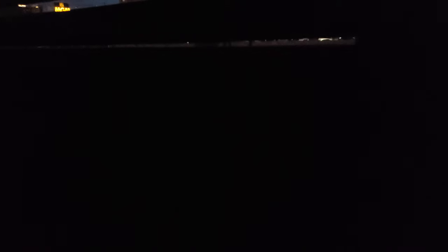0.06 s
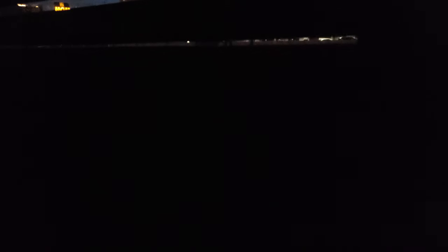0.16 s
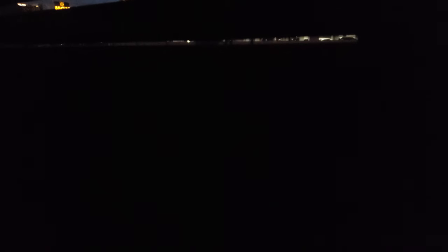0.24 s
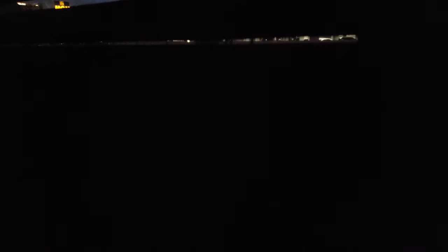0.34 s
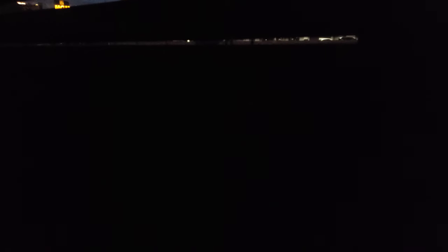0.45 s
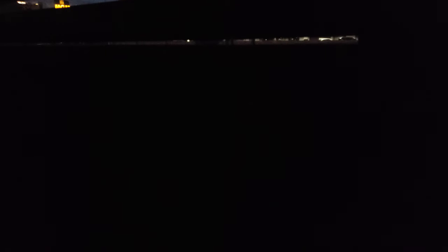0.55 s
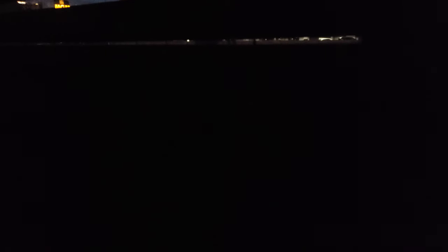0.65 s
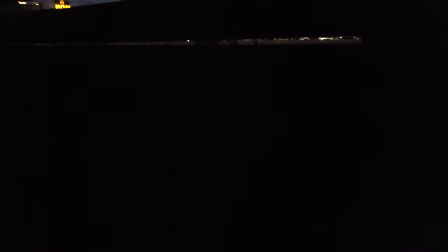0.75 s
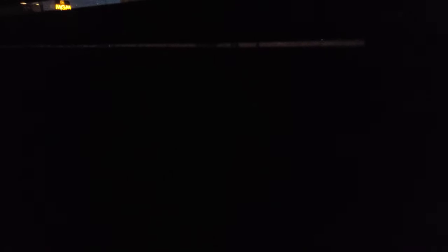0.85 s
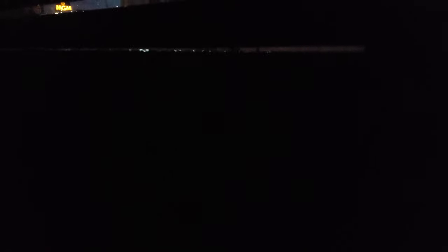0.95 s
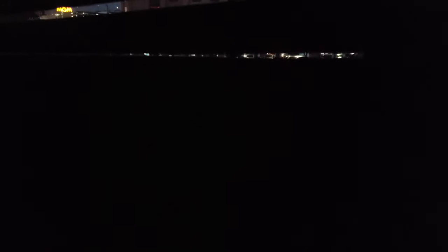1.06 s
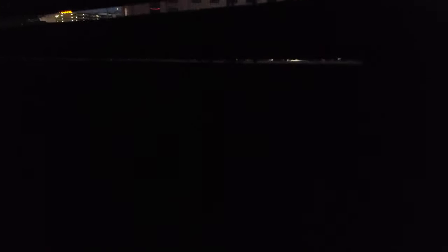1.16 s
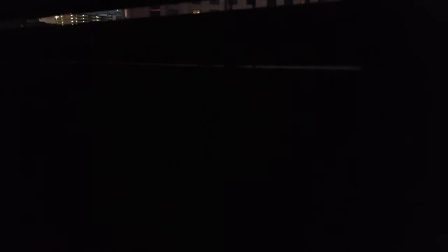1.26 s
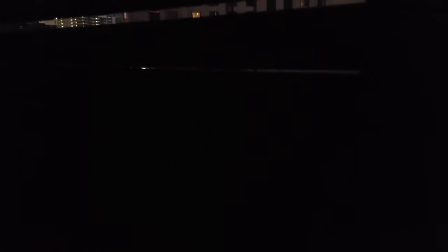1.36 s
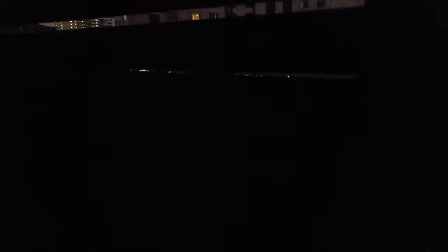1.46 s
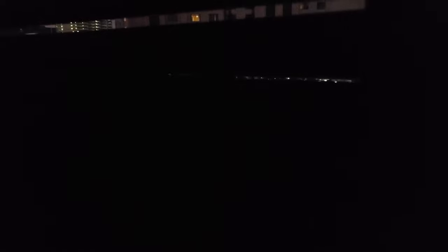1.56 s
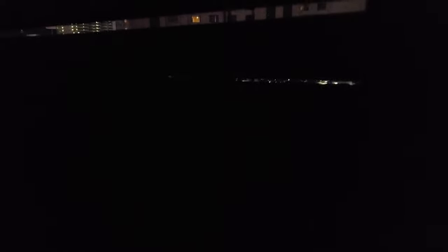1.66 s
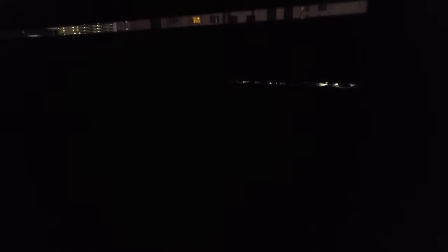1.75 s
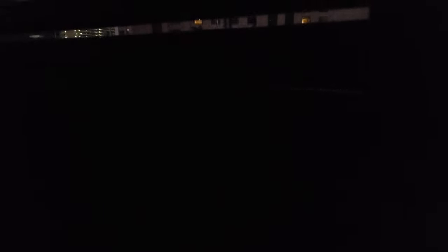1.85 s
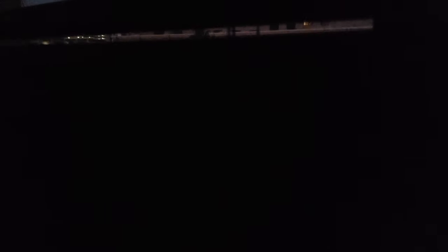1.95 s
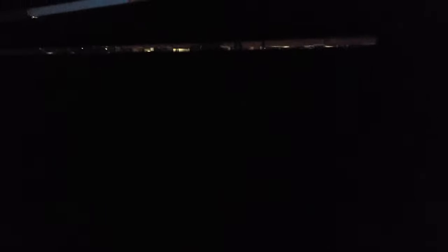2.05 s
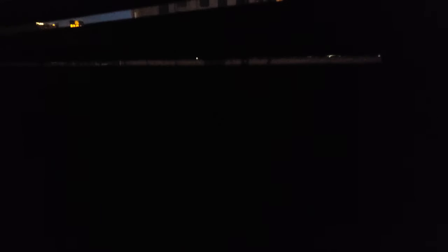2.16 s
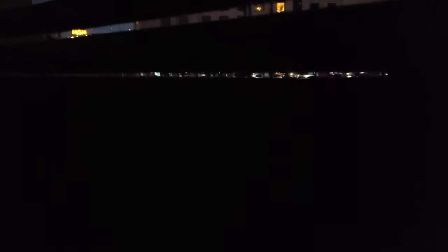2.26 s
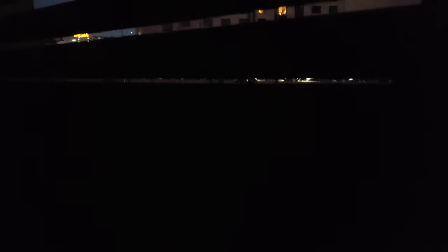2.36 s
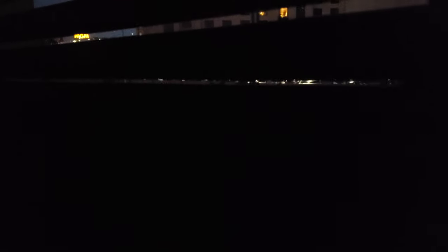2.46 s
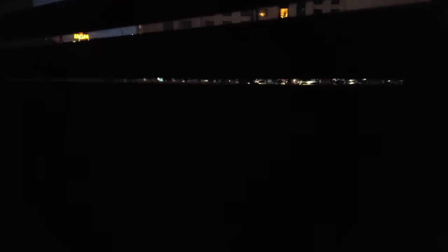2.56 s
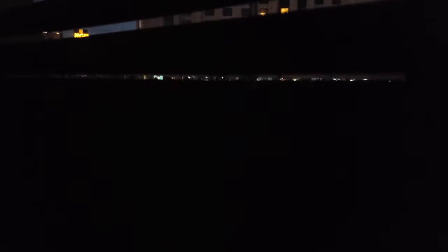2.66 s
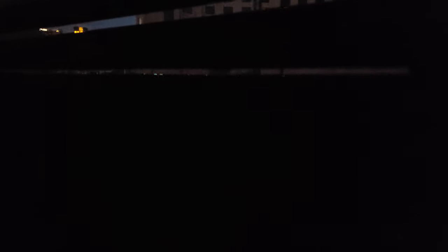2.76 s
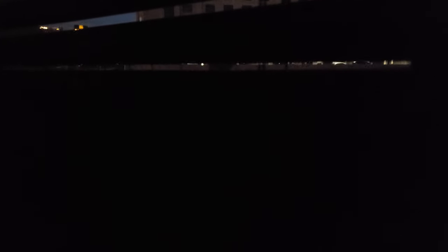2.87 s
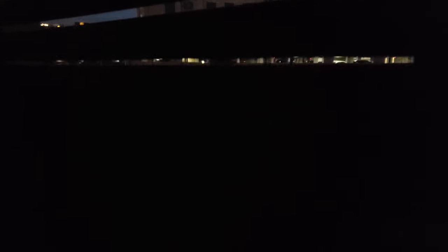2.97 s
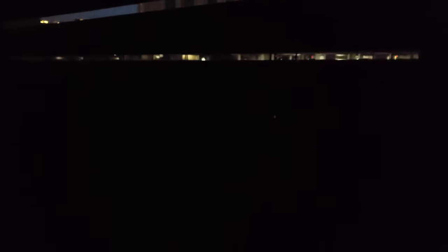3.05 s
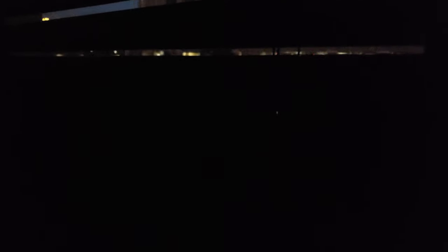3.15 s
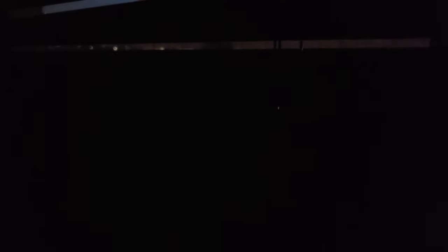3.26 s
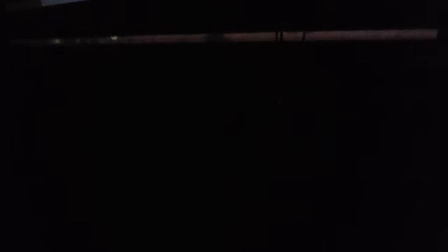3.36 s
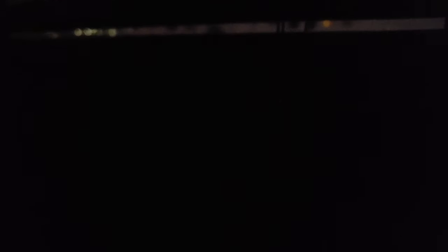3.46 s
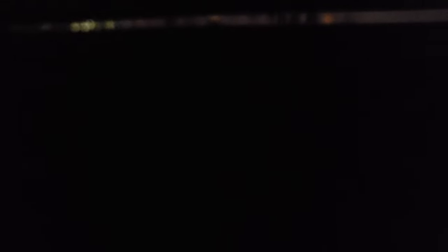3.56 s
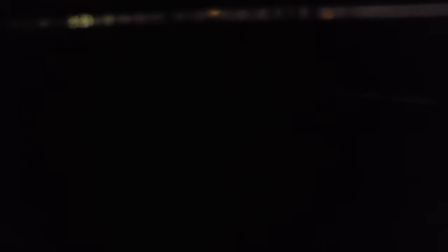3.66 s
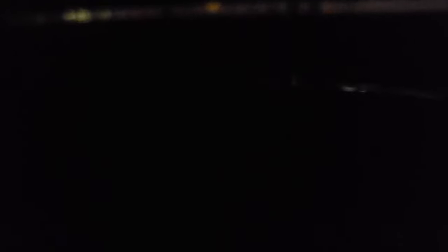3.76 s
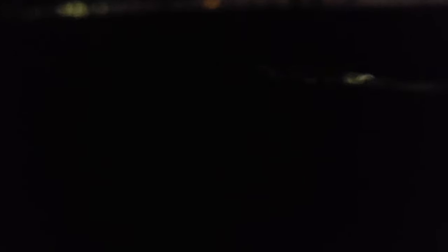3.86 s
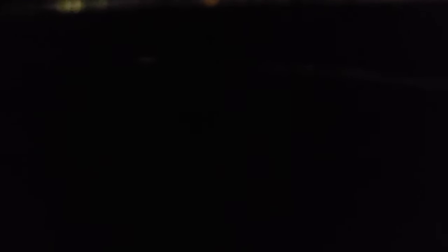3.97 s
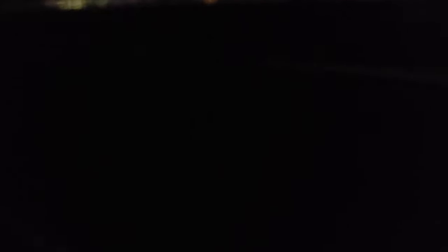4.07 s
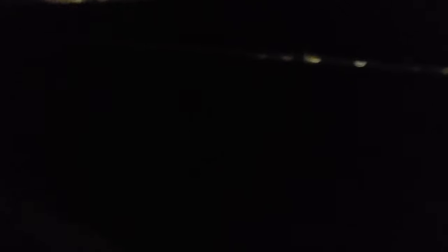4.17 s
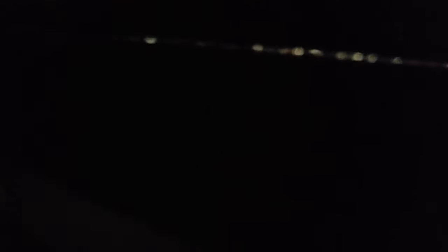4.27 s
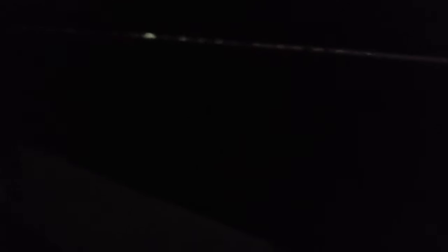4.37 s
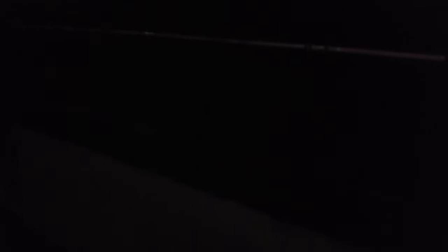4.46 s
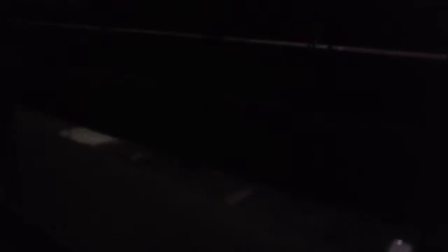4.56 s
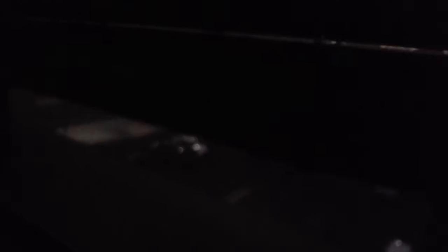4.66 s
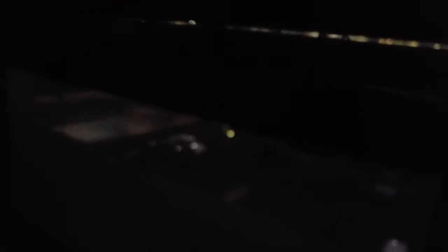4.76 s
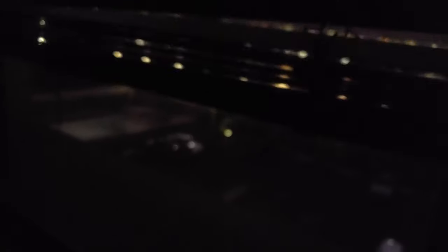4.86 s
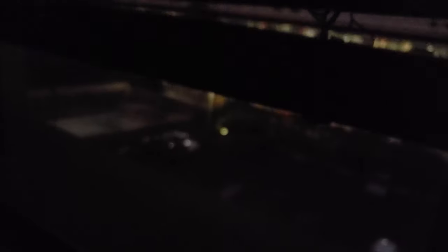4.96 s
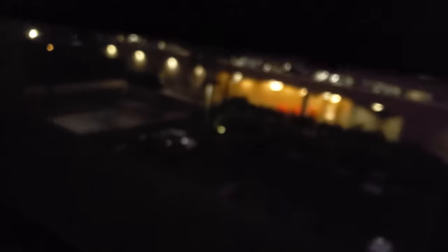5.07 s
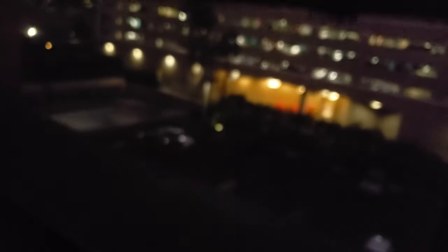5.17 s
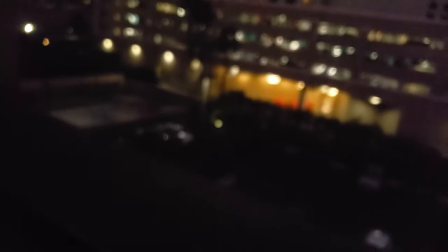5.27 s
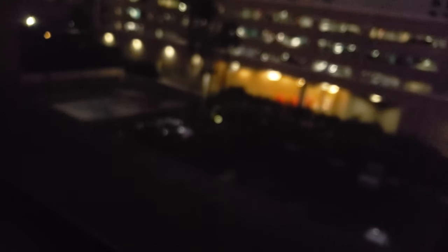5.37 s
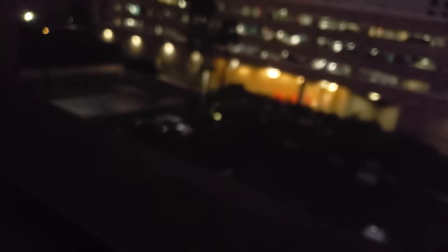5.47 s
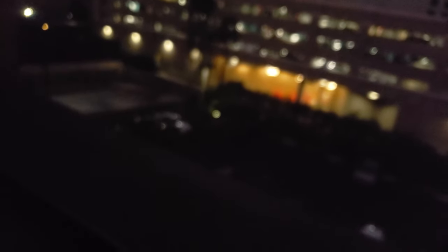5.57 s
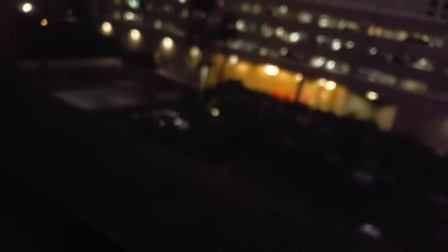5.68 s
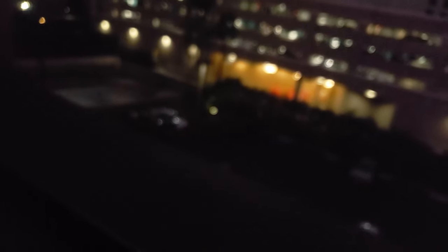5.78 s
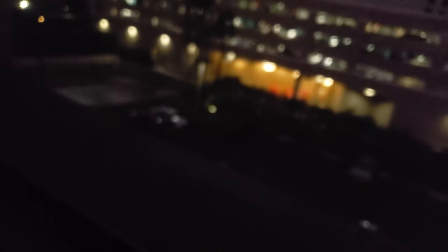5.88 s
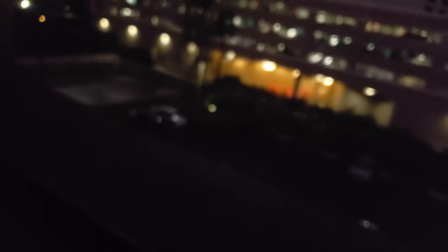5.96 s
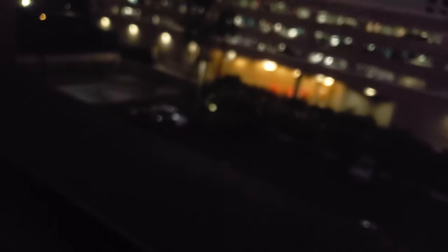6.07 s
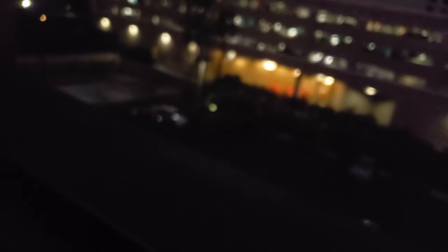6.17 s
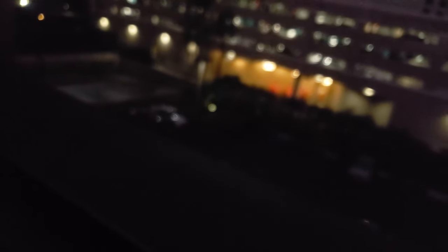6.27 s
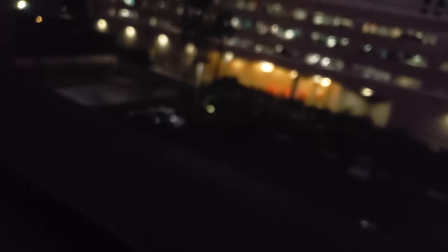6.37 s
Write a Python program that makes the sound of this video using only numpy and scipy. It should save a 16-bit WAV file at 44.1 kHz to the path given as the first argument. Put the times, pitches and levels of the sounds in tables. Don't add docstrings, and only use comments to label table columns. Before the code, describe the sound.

Quiet room at night with a steady low ventilation rumble. Fingers rub softly along a cord, its tassel ticking close by on the right. Then the cord is pulled: a rough hiss runs through a hollow rail while slats rattle and clack together as they stack. Sharp knocks mark the landing, and swaying slats brush more softly until still. Close stereo microphone, short room echo.

```python
import sys
import numpy as np
from scipy import signal
from scipy.fft import rfft, irfft
from scipy.io import wavfile
from scipy.ndimage import uniform_filter1d

SR = 44100
rng = np.random.default_rng(int(sys.argv[2]) if len(sys.argv) > 2 else 0)


def nominal_scale(level):
    x = np.asarray(level, float) / 20
    return 10 ** x


def dump_mix(stems):
    frames = np.atleast_2d(stems).T
    limited = np.clip(frames, -1, 1)
    pcm = np.round(limited * 32767).astype(np.int16)
    wavfile.write(sys.argv[1], SR, pcm)


N = 283197
SIZE = 8192
BODY_PAN_DB = 2.5

# (lowest [Hz], highest [Hz])
ZONES_HZ = [(300, 1000), (1000, 2400), (2400, 8400), (8400, 20000)]
# (frequency [Hz], level per Hz [dB])
FINGER_COLOUR = [(240, -57.5), (400, -11.5), (762, -9), (1640, -9.5), (1890, -8), (3130, -32.5),
                 (3590, -25.5), (5440, -19), (7070, -26), (10500, -17), (13900, -5), (15700, -5)]
# (frequency [Hz], level per Hz [dB])
BLIND_COLOUR = [(180, -52), (300, -17.5), (554, -12.5), (698, -5.5), (988, -9.5), (1520, -4), (2500, -12.5),
                (3200, -10.5), (3970, -11.5), (7330, -15.5), (8510, -17.5), (11700, -16), (15700, -17)]
# (frequency [Hz], width [Hz], boost [dB])
RAIL = [(702.7, 20, 14), (1460, 160, -1), (3250, 430, 1.5), (1090, 16, 0), (1406, 54, 8), (1533, 38, 5.5),
        (1690, 30, 8), (2150, 40, 3)]
# (time [s], effort [dB])
PULL = [(2.7, -36), (2.85, -42.5), (3.14, -15), (3.18, -10.5), (3.34, -4.5), (3.45, -6), (3.58, -2.5),
        (3.72, -1), (3.86, 1), (4.08, -0.5), (4.2, -2), (4.4, 0), (4.58, -2.5), (4.69, -2), (4.91, -12),
        (5.03, -15.5), (5.3, -12.5)]


def rms_one(x):
    return x / np.sqrt(np.mean(x ** 2) + 1e-30)


def in_time(rows):
    s, *columns = np.transpose(rows)
    return np.array([np.interp(np.arange(N) / SR, s, c) for c in columns])


def at_hz(points, hz):
    listed_hz, values = np.array(points).T
    return np.interp(np.log(hz), np.log(listed_hz), values)


def drift(rate):
    r = np.exp(-80 * np.pi * rate / SR)
    white = rng.standard_normal(N // 40 + 2002)
    slow = signal.lfilter([1], [1, -2 * r, r * r], white)[2000:]
    return np.interp(np.arange(N) / 40, np.arange(len(slow)), rms_one(slow))


def response(spectrum, peaks, low_hz, high_hz):
    hz = np.maximum(np.arange(SIZE // 2 + 1), .1) * SR / SIZE
    db = at_hz(spectrum, np.minimum(hz, 15600))
    db = db - 10 * np.log10((1 + (low_hz / hz) ** 10) * (1 + (hz / high_hz) ** 10))
    for centre_hz, width_hz, peak_db in peaks:
        db = db + peak_db / (1 + (2 * (hz - centre_hz) / width_hz) ** 2)
    cepstrum = irfft(np.log(nominal_scale(np.maximum(db, db.max() - 90))))
    cepstrum[1:SIZE // 2] *= 2
    h = irfft(np.exp(rfft(cepstrum[:SIZE // 2], SIZE)))[:SIZE // 2]
    return h / np.sqrt(np.sum(h ** 2))


def through(x, h):
    return signal.oaconvolve(x, np.atleast_2d(h), axes=1)[:, :x.shape[1]]


def pair(white, hz):
    # (frequency [Hz], left-right likeness [-1 to 1])
    likeness = [(60, 1), (150, 0.88), (380, 0.89), (950, 0.34), (2380, -0.18), (5980, 0.015),
                (15000, 0.026)]
    alike = np.clip(at_hz(likeness, hz), -.99, .99)
    shared = np.sqrt(1 + alike) * white[0]
    opposed = np.sqrt(1 - alike) * white[1] * [[1], [-1]]
    return (shared + opposed) / np.sqrt(2)


def sides(pan_db):
    return nominal_scale(np.multiply.outer([.5, -.5], pan_db))


def zone_levels(effort, strokes, zones, span):
    lean = [-1.12, -0.21, -0.17, 1.0]
    attack_s, fall_db_per_s = 0.019, 216
    t = np.arange(N)[span] / SR
    base_db, follows, offset_db = np.transpose(zones)[..., None]
    power = nominal_scale(base_db + follows * in_time(effort)[0][span]) ** 2
    for start, hold, db, brightness_db in strokes:
        rise = np.clip((t - start) / attack_s, 0, 1)
        fall = nominal_scale(-fall_db_per_s * np.maximum(t - start - hold, 0))
        power += (rise * fall * nominal_scale(db + offset_db + brightness_db * np.array(lean)[:, None])) ** 2
    return np.sqrt(power)


def rubbing(rows, strokes, zones, colour, peaks, flicker_db, grains_per_s, grain_db, pan_db):
    wander = .011
    span = slice(round((rows[0][0] - .02) * SR), round((rows[-1][0] + .02) * SR))
    levels = zone_levels(rows, strokes, zones, span)
    steps = np.arange(levels.shape[1])
    sounding = np.sqrt(np.clip(np.minimum(steps, steps[::-1]) / (.04 * SR), 0, 1))
    sizes_db = grain_db + 1.2 * np.minimum(rng.exponential(1, len(steps)), 3)
    snags = (rng.random(len(steps)) < grains_per_s / SR) * nominal_scale(sizes_db)
    push = (1 + signal.lfilter([1], [1, -.985], snags)) * nominal_scale(flicker_db * drift(25)[span])
    pans = [sides(BODY_PAN_DB)[:, None]] * 3 + [sides(pan_db)[:, None]]
    out = np.zeros((2, N))
    for (low_hz, high_hz), level, pan in zip(ZONES_HZ, levels, pans):
        hiss = pair(rng.standard_normal((2, len(steps))), np.sqrt(low_hz * high_hz))
        force = rms_one(push * nominal_scale(2.0 * flicker_db * drift(33)[span]) * hiss) * level * sounding
        tilt = .5 * (1 + np.tanh(2 * drift(1.5)[span]))
        poses = [(1, 1)]
        if peaks and low_hz < 2000:
            poses = [(1 - tilt, 1 - wander), (tilt, 1 + wander)]
        for share, shift in poses:
            pose = [(shift * hz, width_hz, db) for hz, width_hz, db in peaks]
            out[:, span] += through(force * pan * share, response(colour, pose, low_hz, high_hz))
    return out


def blows(rows, colour, peaks, trim_db, rise, crack, bright_share, bright_db, pan_db):
    out, steps = 0, np.arange(2048)
    shakes = rng.standard_normal((len(rows), 4, 2, len(steps)))
    for zone, (low_hz, high_hz) in enumerate(ZONES_HZ):
        h = response(colour, peaks, low_hz, high_hz)
        force = np.zeros((2, N + len(steps)))
        lasting = [2.2, 1.3, 2.16, 1.34][zone]
        pan = sides(pan_db if zone == 3 else BODY_PAN_DB)[:, None]
        for (s, db, depth_db, t60_ms), shake in zip(rows, shakes[:, zone]):
            age = steps / (max(t60_ms, 1) * lasting * SR / 1000)
            burst = pair(shake, np.sqrt(low_hz * high_hz)) * np.tanh(age / rise)
            burst = burst * (nominal_scale(-60 * age) + crack * (zone < 3) * nominal_scale(-300 * age))
            top = np.abs(through(burst, h[:len(steps)])).max(axis=1, keepdims=True)
            zone_db = [depth_db - 7.0, depth_db, bright_share * depth_db + bright_db, 0][zone]
            at = round(s * SR)
            force[:, at:at + len(steps)] += nominal_scale(db + zone_db + trim_db) * pan * burst / top
        out = out + through(force[:, :N], h)
    return out


def knocks(rows, trim_db, partner, pan_db):
    out, t = np.zeros(N + SIZE), np.arange(SIZE) / SR
    for s, db, hz, t60 in rows:
        tone = np.sin(2 * np.pi * hz * t) + partner * np.sin(2 * np.pi * 1.13 * hz * t)
        fall = nominal_scale(db + trim_db - 60 * t / max(t60, .002))
        out[round(s * SR):][:SIZE] += fall * tone * np.tanh(t / 0.00034)
    return out[:N] * sides(pan_db)[:, None]


def chafes(rows):
    glide = 0.028
    out = np.zeros((2, N))
    grit = nominal_scale(2.76 * drift(76))
    for start, end, first_hz, width_hz, db in rows:
        at, length = round(start * SR), round((end - start) * SR)
        stroke = np.sin(np.linspace(0, np.pi, length)) ** 0.4 * grit[at:at + length]
        draw = [pair(white, first_hz) for white in rng.standard_normal((2, 2, SIZE * 5))]
        narrow = signal.butter(2, width_hz / 2, fs=SR, output="sos")
        wobble = signal.sosfilt(narrow, draw)[..., -length:]
        pan = sides(-9 if 2 < start < 2.5 or first_hz > 9000 else BODY_PAN_DB)[:, None]
        phase = 2 * np.pi * first_hz * np.cumsum(1 + glide * np.linspace(-1, 1, length)) / SR
        tone = wobble[0] * np.sin(phase) + wobble[1] * np.cos(phase)
        out[:, at:at + length] += nominal_scale(db) * stroke * pan * rms_one(tone)
    return out


def ventilation():
    # (frequency [Hz], level per Hz [dB])
    rumble = [(16, -41), (28, -1), (71, -1.5), (92, -0.5), (145, 0.5), (227, -10), (365, -22), (406, -33),
              (727, -35.5), (809, -28), (1030, -32), (1740, -44), (8540, -59.5), (15700, -42)]
    # (frequency [Hz], width [Hz], boost [dB])
    duct = [(70.6, 14, 6), (139.7, 12, 7.5), (342.6, 30, 4), (284.5, 2.76, 16.5), (556.3, 5.4, 20.5),
            (732.7, 36, 15)]
    # (time [s], level [dB])
    swell = [(0.0, -51.5), (0.35, -52), (0.82, -50.5), (1.73, -48.5), (2.2, -51.5), (2.59, -50),
             (2.93, -52), (3.18, -48.5), (4.06, -52.5), (4.77, -48), (5.18, -50), (5.42, -56), (6.42, -53)]
    out, levels_db = 0, [in_time(swell)[0], -62, -68, -73]
    for low_hz, high_hz, db in zip([29, 250, 450, 1000], [250, 450, 1000, 20000], levels_db):
        hiss = pair(rng.standard_normal((2, N)), np.sqrt(low_hz * high_hz))
        out = out + nominal_scale(db) * through(hiss, response(rumble, duct, low_hz, high_hz))
    return out * sides(2.1)[:, None]


def room(x):
    t60_s, level_db, cut_hz = 0.37, -7, 7900
    t = np.arange(SR // 2) / SR
    tail = rng.standard_normal((2, len(t))) * nominal_scale(-60 * t / t60_s) * np.clip(t / 0.0038, 0, 1)
    bass = signal.sosfiltfilt(signal.butter(2, 800, fs=SR, output="sos"), tail)
    dulling = signal.butter(1, cut_hz, fs=SR, output="sos")
    tail = signal.sosfilt(dulling, tail - bass + bass[0])
    return nominal_scale(level_db) * through(x, tail / np.sqrt(np.sum(tail ** 2) / 2))


def finger_rub():
    # (time [s], effort [dB])
    fingers = [(.02, -11), (.45, -7), (.63, 1), (.83, -0.5), (1.0, 5.5), (1.9, 10), (2.05, -1),
               (2.45, -1.5), (2.7, -5)]
    # (start [s], hold [s], level [dB], brightness [dB])
    slips = [(1.286, 0.071, -75, 15), (1.396, 0.029, -70.5, -15.5), (1.572, 0.033, -72.5, -18),
             (1.737, 0.12, -58, -0.5), (2.1, 0.03, -64, -4), (2.25, 0.079, -78, 0),
             (2.427, 0.096, -81.5, -10)]
    # (level at effort 0 [dB], follows effort [dB per dB], stroke offset [dB])
    finger_zones = [(-71, -0.21, -5.5), (-85, 0.47, 2.5), (-95, 1.96, -1.5), (-75.5, 0.7, -5)]
    return rubbing(fingers, slips, finger_zones, FINGER_COLOUR, [],
                   flicker_db=0.5, grains_per_s=34, grain_db=-40, pan_db=-11.5)


def edge_drags():
    # (start [s], end [s], pitch [Hz], width [Hz], level [dB])
    drags = [(0.79, 1.26, 16600, 3400, -69), (1.517, 1.596, 13700, 2600, -64),
             (1.75, 1.846, 2520, 1000, -57), (1.28, 1.36, 1600, 430, -69.5), (5.88, 6.17, 1490, 55, -68),
             (4.78, 4.93, 13000, 4000, -58), (1.285, 1.36, 5500, 1100, -85), (4.75, 4.9, 450, 250, -47.5),
             (1.81, 1.9, 4650, 500, -62), (2.05, 2.13, 4850, 320, -84), (2.09, 2.16, 5050, 450, -68),
             (2.125, 2.155, 10000, 660, -68), (5.1, 5.2, 12000, 3500, -48),
             (4.25, 4.34, 12500, 3500, -49.5), (2.086, 2.154, 1800, 150, -63.5),
             (2.07, 2.15, 9550, 830, -81), (2.2, 2.22, 3550, 470, -62), (2.25, 2.37, 3670, 810, -72.5),
             (2.262, 2.36, 14700, 4700, -53), (2.09, 2.15, 14700, 1800, -63),
             (3.02, 3.16, 13000, 2200, -76), (2.305, 2.356, 2250, 410, -57), (2.74, 2.768, 3250, 300, -77),
             (2.76, 3.16, 7200, 1500, -82), (2.74, 2.9, 1500, 890, -72), (5.04, 5.085, 166, 133, -36),
             (3.309, 3.385, 2900, 740, -47)]
    return chafes(drags)


def close_ticks():
    # (time [s], peak [dB], depth [dB], fall by 60 dB [ms])
    taps = [(1.3684, -55, -17, 6.7), (1.4032, -50.5, -6, 10), (1.5289, -58, -25, 6),
            (1.5832, -52.5, 6, 5.2), (1.713, -51.5, -1, 6.3), (1.7501, -43.5, 7, 7.4),
            (2.128, -34, -16, 4.2), (2.1568, -53, -6, 3.5), (2.1678, -27.5, -25, 4.6),
            (2.1914, -29, -27, 3), (2.1982, -31, -22, 4.7), (2.203, -33, -26, 3), (2.2064, -38, -23, 4),
            (2.333, -34, -53, 1.4), (2.749, -60, -23, 2.6)]
    # (time [s], peak [dB], pitch [Hz], fall by 60 dB [s])
    beads = [(2.128, -46, 7030, 0.0045), (2.128, -50, 3600, 0.0059), (2.1985, -39.5, 3600, 0.018),
             (1.404, -50, 1470, .012), (1.369, -55, 7000, .005), (1.53, -52, 12500, .005),
             (1.541, -56, 13200, .005), (1.729, -49, 12000, .005), (1.739, -50, 12000, .005),
             (1.7525, -39.5, 1850, 0.12), (2.168, -36, 7160, 0.0072), (2.1915, -36, 7100, .008),
             (2.168, -41, 3550, .015), (2.1915, -38, 3600, 0.01), (2.333, -33, 11300, .005)]
    right_edges = [(2.1281, -18.5, 13800, .004), (2.1983, -21, 14200, .004), (2.6862, -52, 11500, .004),
                   (4.5153, -30, 14000, .006), (4.7058, -25, 13000, .005), (4.7268, -26, 12500, .005),
                   (4.7382, -21, 13500, .006), (5.0605, -14, 14600, .005), (5.0898, -9, 12300, .004),
                   (5.0999, -8, 14830, .005)]
    tick_peaks = [(3600, 710, 10.5), (7100, 820, 7.4), (13500, 1800, 11)]
    out = blows(taps, FINGER_COLOUR, tick_peaks, trim_db=0.0, rise=0.016, crack=5.1,
                bright_share=0.2, bright_db=1.5, pan_db=-15.0)
    out = out + knocks(beads, trim_db=-0.5, partner=0.088, pan_db=1)
    return out + knocks(right_edges, trim_db=-0.6, partner=.31, pan_db=-14.0)


def swaying_slats():
    # (time [s], effort [dB])
    settle = [(5.3, 3.5), (5.43, 2), (5.6, -1), (6.09, -2), (6.19, -8), (6.28, -19.5), (6.42, -36)]
    # (start [s], hold [s], level [dB], brightness [dB])
    brushes = [(5.635, 0.089, -56.5, 7), (5.75, 0.089, -62, 0), (5.993, 0.073, -62.5, 4)]
    # (level at effort 0 [dB], follows effort [dB per dB], stroke offset [dB])
    sway_zones = [(-59.5, 1.08, 1), (-54.5, 1.2, 5.5), (-61.5, 1.1, -1.5), (-58, 0.62, -3)]
    # (frequency [Hz], level per Hz [dB])
    sway_colour = [(240, -48), (400, -19.5), (569, -15.5), (717, -15.5), (786, -17.5), (1170, -14.5),
                   (1500, -3), (2490, -19), (6960, -20.5), (8760, -29), (15700, -25)]
    # (frequency [Hz], width [Hz], boost [dB])
    slats = [(723, 28, 9.5), (1500, 20, 8)]
    return rubbing(settle, brushes, sway_zones, sway_colour, slats,
                   flicker_db=0.05, grains_per_s=59, grain_db=-24.0, pan_db=2.0)


def more_drags():
    # (start [s], end [s], pitch [Hz], width [Hz], level [dB])
    tints = [(1.29, 1.46, 6700, 900, -80), (1.55, 1.66, 6700, 900, -79), (1.75, 1.93, 6600, 1100, -68.5),
             (1.78, 1.89, 14200, 1800, -66), (1.79, 1.87, 9500, 800, -73), (2.26, 2.31, 2050, 200, -71),
             (2.21, 2.36, 7000, 900, -78), (3.71, 3.8, 3100, 200, -51), (4.1, 4.135, 10000, 1500, -50),
             (4.36, 4.5, 11600, 900, -51), (4.55, 4.66, 3250, 400, -52), (6.15, 6.35, 1700, 350, -68),
             (2.94, 3.16, 1700, 400, -63.5), (4.8, 5.0, 1100, 300, -63), (4.88, 5.02, 415, 100, -55),
             (1.752, 1.81, 2000, 160, -58), (3.3, 3.4, 1500, 460, -49), (5.55, 6.2, 1900, 300, -63),
             (0.9, 1.7, 14500, 1500, -76)]
    return chafes(tints)


def landing():
    # (time [s], peak [dB], depth [dB], fall by 60 dB [ms])
    bounces = [(5.0418, -35, -6, 40), (5.0603, -13, -47, 4.9), (5.0886, -7, -16.5, 4),
               (5.0902, -10.5, -26, 3.6), (5.0994, -14, -25, 5.5), (5.1267, -33, 4, 12),
               (5.224, -29, -10, 9.2), (5.2280, -22, -9.5, 14.5), (5.2394, -20.5, -11.5, 8.5),
               (5.4996, -56, 13.5, 5.7), (5.5074, -55, 18, 4.1), (5.6468, -47.5, -4.5, 14),
               (5.7975, -40.5, 2, 4), (5.8294, -60, 15.5, 150), (6.0766, -54, -29, 9.8),
               (6.41, -58, -22, 15)]
    return blows(bounces, BLIND_COLOUR, RAIL[1:3], trim_db=4.5, rise=0.017, crack=1.0,
                 bright_share=0.45, bright_db=1.5, pan_db=-2.5)


def ringing_parts():
    # (time [s], peak [dB], pitch [Hz], fall by 60 dB [s])
    bar_knocks = [(1.404, -50, 581, 0.27), (1.583, -46, 646, 0.048), (3.16, -27.5, 2146, 0.035),
                  (3.6752, -14, 1690, 0.011), (3.847, -40, 1760, 0.025), (3.941, -23, 870, 0.02),
                  (4.015, -23, 910, 0.096), (4.3464, -9.5, 1280, 0.023), (4.715, -26.5, 1194, 0.13),
                  (4.737, -17, 676, 0.025), (5.042, -29, 537, 0.063), (5.051, -23, 697, 0.045),
                  (5.125, -24.5, 764, 0.024), (5.501, -40, 1640, 0.043), (5.831, -32, 760, 0.0097),
                  (1.714, -35, 6260, 0.003), (1.752, -31, 4750, 0.0067), (2.157, -31, 6000, 0.0042),
                  (3.848, -16.5, 3170, 0.0075), (4.7385, -15, 1486, 0.021), (5.1265, -23, 3020, 0.008),
                  (5.648, -44.5, 2870, 0.039), (5.798, -28, 4340, 0.005)]
    thuds = [(1.58, -79, 159, 0.087), (4.74, -27, 443, 0.091), (4.759, -33, 145, 0.11),
             (5.042, -30.5, 163, 0.065), (5.0475, -19, 339, 0.05)]
    pings = [(5.1, -22, 8430, .004), (3.2505, -37, 14000, .005), (3.355, -40, 13000, .004),
             (3.4515, -40, 12000, .004), (3.484, -35, 11800, 0.0065), (3.667, -31, 6300, 0.0055),
             (3.8, -42, 6600, .008), (3.8826, -32.5, 11500, 0.0066), (3.9175, -20, 12100, 0.0087),
             (3.97, -27, 15000, .005), (3.977, -25.5, 15200, .008), (4.016, -20.5, 2780, 0.018),
             (4.116, -33, 10300, .006), (4.135, -32.5, 12000, .004), (4.671, -39, 13000, .005),
             (4.717, -25.5, 6800, .008), (4.814, -31, 12520, .006), (4.907, -42, 14000, .005),
             (4.916, -42, 14050, .006), (5.0895, -6, 13500, 0.0061), (5.224, -31.5, 14500, .008),
             (3.8265, -20.5, 15000, 0.0065), (5.229, -20.5, 4200, 0.0093)]
    touches = [(1.404, -53, 11400, .006), (1.404, -58, 5200, .008), (1.422, -58, 11500, .005),
               (1.423, -64, 5500, .008), (1.714, -49, 11300, .005), (1.752, -50, 9500, .006),
               (3.6755, -27.5, 900, 0.044), (3.827, -30, 1800, .015), (3.914, -30, 9000, .006),
               (3.9172, -20, 7860, .007), (4.0165, -25, 4140, 0.018), (4.347, -29, 3140, .015),
               (4.7122, -15.5, 4160, 0.0066), (5.484, -49, 1520, .03), (5.5065, -37.5, 1270, 0.027),
               (5.5635, -45, 1500, 0.043), (5.648, -38, 13000, .006), (5.833, -46, 3500, .01),
               (5.8895, -48, 3000, .01), (5.944, -50, 1480, 0.033), (6.0772, -47.5, 11900, .006),
               (6.293, -64.5, 1860, .02), (6.317, -62, 1470, .02)]
    out = knocks(bar_knocks, trim_db=-4.5, partner=0.5, pan_db=1.5)
    out = out + knocks(thuds, trim_db=-5.5, partner=.35, pan_db=3.5)
    out = out + knocks(pings, trim_db=2.0, partner=0.25, pan_db=-3.0)
    return out + knocks(touches, trim_db=0.5, partner=0.37, pan_db=3.5)


def chatter():
    touches_per_s, level_db, ring_cycles = 300, -41.5, 13.8
    span = slice(round(PULL[2][0] * SR), round(PULL[-1][0] * SR))
    out = np.zeros((2, N))
    born = rng.random(N) < touches_per_s * nominal_scale(4.0 * drift(7)) / SR
    sizes_db = level_db + in_time(PULL)[0] + 3.2 * np.minimum(rng.exponential(1, N), 3)
    clicks = (born * nominal_scale(sizes_db) * sides(7 * rng.standard_normal(N)))[:, span]
    dealt = rng.integers(0, 12, N)[span]
    for k, hz in enumerate(np.geomspace(850, 7500, 12)):
        r, w = nominal_scale(-60 * hz / (ring_cycles * SR)), 2 * np.pi * hz / SR
        touched = clicks * (dealt == k) + 1e-18
        out[:, span] += signal.lfilter([0, np.sin(w)], [1, -2 * r * np.cos(w), r * r], touched)
    return out


def slat_clacks():
    # (time [s], peak [dB], depth [dB], fall by 60 dB [ms])
    clacks = [(3.1602, -45.5, 16.5, 7.9), (3.1817, -47, 12, 29), (3.2502, -48, -25, 8),
              (3.4837, -33, -28, 9.2), (3.6231, -16, -19, 8.9), (3.634, -33.5, 1.5, 14),
              (3.6665, -23.5, -7.5, 14), (3.6752, -24, -1, 11), (3.8265, -23, -22.5, 6.9),
              (3.8474, -32.5, 5, 7.8), (3.917, -16.5, -38, 30), (3.9414, -32, -2, 8.4),
              (3.9754, -36, -22.5, 11), (4.0123, -17.5, -6, 34), (4.0158, -14.5, -17, 9.5),
              (4.0234, -38, 8.5, 11), (4.165, -45.5, -1.5, 7.1), (4.2629, -30, -16.5, 12),
              (4.2866, -41.5, 4, 9.8), (4.308, -39, 0, 12), (4.3169, -27.5, -9, 15), (4.3455, -15, -5, 11),
              (4.36, -27.5, -8.5, 9.4), (4.4832, -54, -12, 6.8), (4.5141, -28.5, -6.5, 13),
              (4.5244, -37.5, 0.5, 11), (4.7047, -25, -27.5, 14), (4.7104, -25, -3, 25),
              (4.7157, -19, -6, 11), (4.7250, -29, 5.5, 11), (4.7366, -19, -1.5, 10.4),
              (4.7408, -31, 9, 4.3), (4.7544, -50, -4, 9.3)]
    return blows(clacks, BLIND_COLOUR, RAIL[1:3], trim_db=3.5, rise=0.032, crack=1.66,
                 bright_share=0.47, bright_db=3.0, pan_db=0.0)


def running_cord():
    # (start [s], hold [s], level [dB], brightness [dB])
    flurries = [(3.616, 0.032, -39, 0.5), (3.884, 0.036, -45, -3), (4.256, 0.041, -52, 10),
                (4.704, 0.011, -42.5, -8), (4.828, 0.024, -58.5, -11.5), (5.052, 0.016, -40, 1),
                (5.117, 0.12, -49, 5)]
    # (level at effort 0 [dB], follows effort [dB per dB], stroke offset [dB])
    cord_zones = [(-46.5, 0.59, -3.5), (-41, 1.04, 3), (-43.5, 1.19, 4), (-40.5, 1.03, 1.3)]
    return rubbing(PULL, flurries, cord_zones, BLIND_COLOUR, RAIL,
                   flicker_db=0.76, grains_per_s=58, grain_db=-28.0, pan_db=1.4)


def scene():
    rubs = edge_drags()
    ticks = close_ticks()
    hits = landing() + ringing_parts() + chatter() + slat_clacks()
    echoes = room(hits + nominal_scale(-4.5) * ticks + nominal_scale(-9.0) * rubs)
    contacts = hits + ticks + rubs + echoes
    friction = finger_rub() + swaying_slats() + more_drags() + running_cord()
    return ventilation() + contacts + friction


def top_cut(x):
    return signal.sosfilt(signal.butter(12, 16970, fs=SR, output="sos"), x)


def record(dry):
    # (frequency [Hz], width [Hz], boost [dB])
    microphone = [(6990, 1700, 7), (8460, 4000, -4)]
    heard = through(dry, response([(20, 0), (20000, 0)], microphone, 12, 40000))
    cut = signal.sosfiltfilt(signal.cheby2(12, 35, 16060, fs=SR, output="sos"), heard)
    top = signal.sosfiltfilt(signal.cheby2(10, 40, 17000, fs=SR, output="sos"), heard - cut)
    usual = uniform_filter1d(np.abs(top), size=4096)
    sharp = uniform_filter1d(np.abs(top), size=128) > 6.5 * usual
    clicks = top * uniform_filter1d(sharp * 1., size=64)
    return top_cut(cut + nominal_scale(-0.5) * clicks)


dry = scene()
out = record(dry)
dump_mix(out)
```